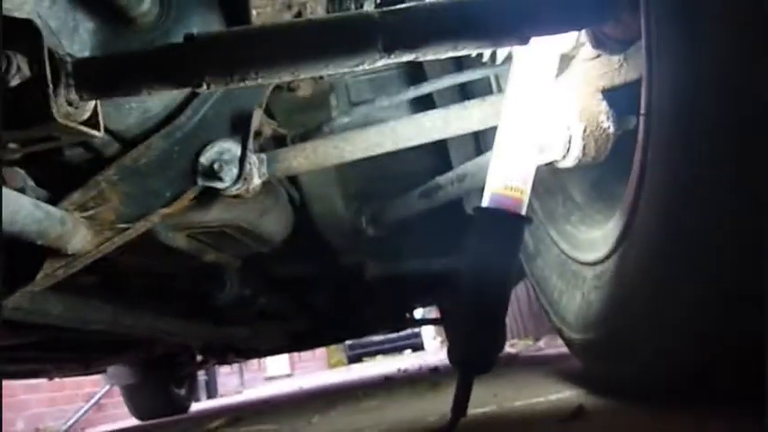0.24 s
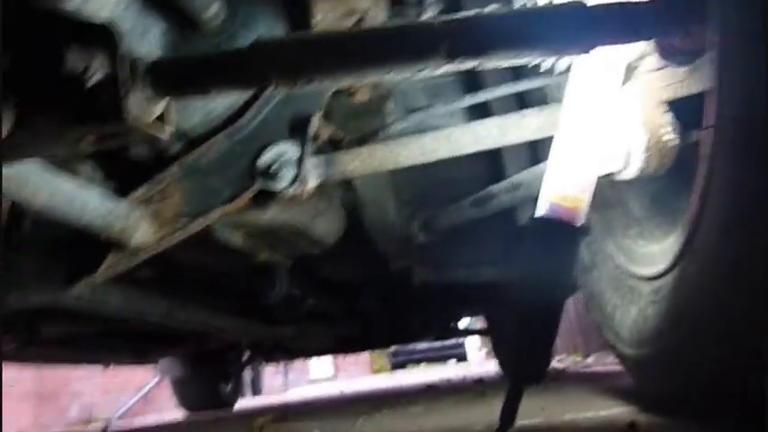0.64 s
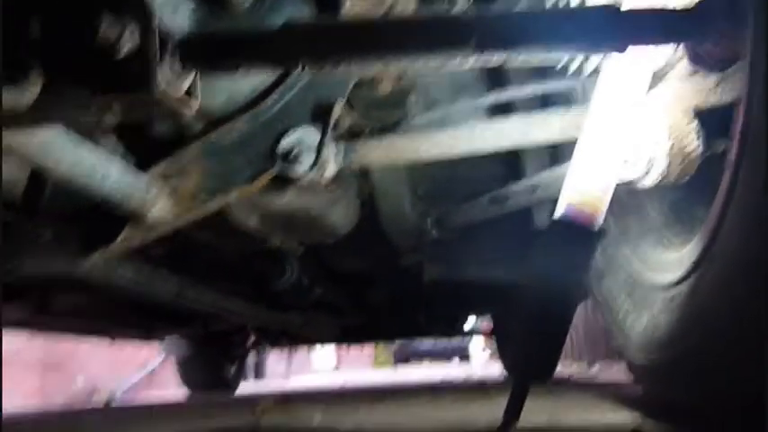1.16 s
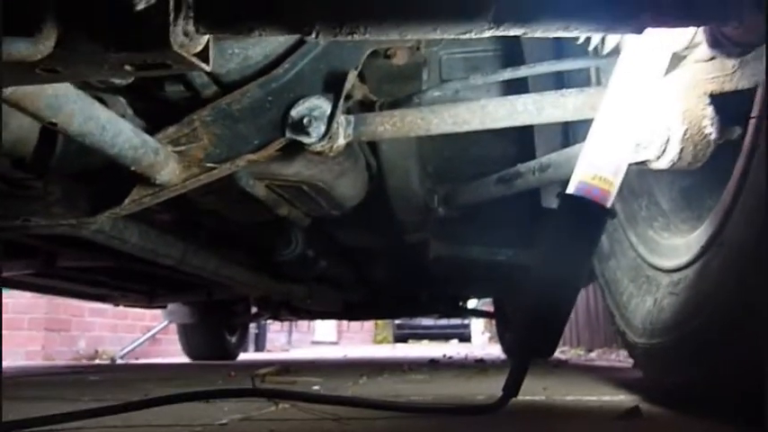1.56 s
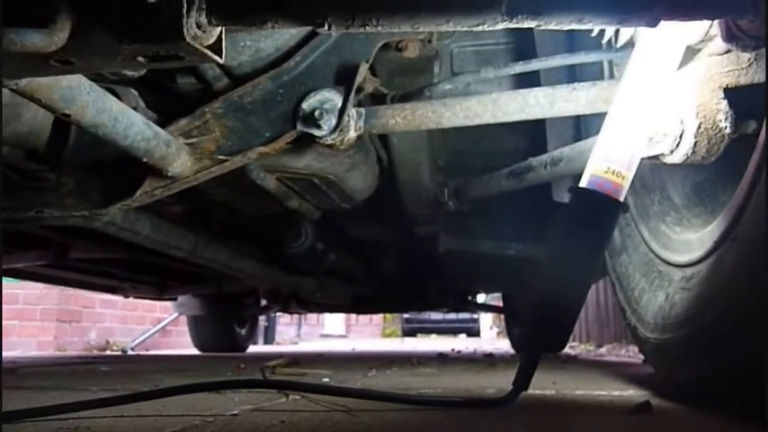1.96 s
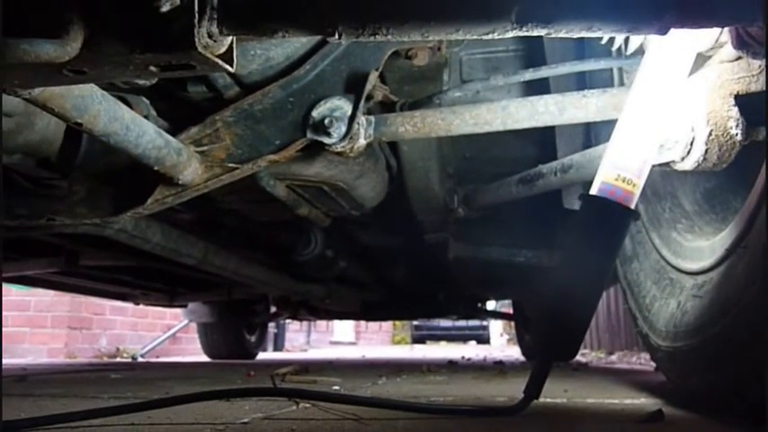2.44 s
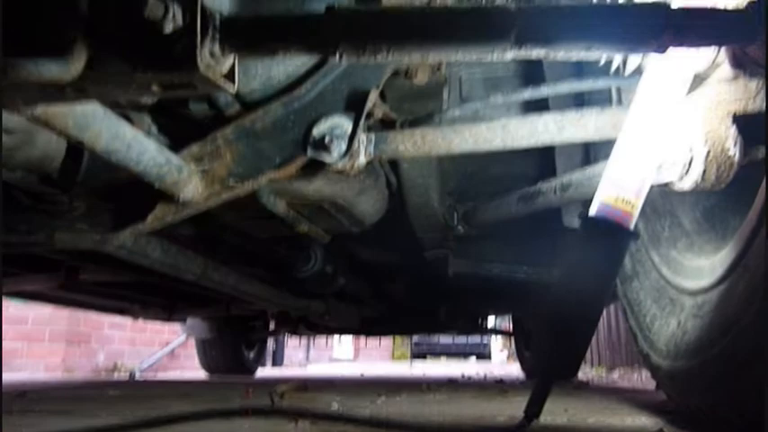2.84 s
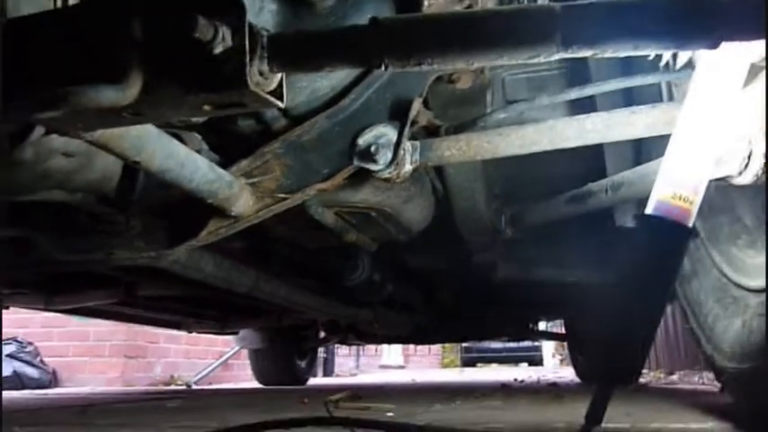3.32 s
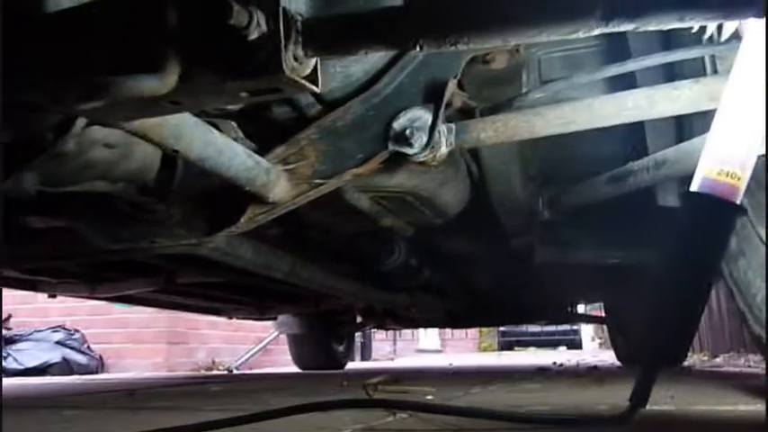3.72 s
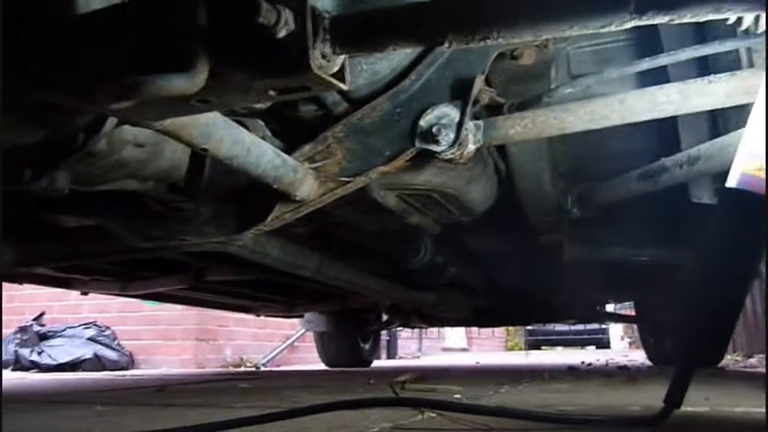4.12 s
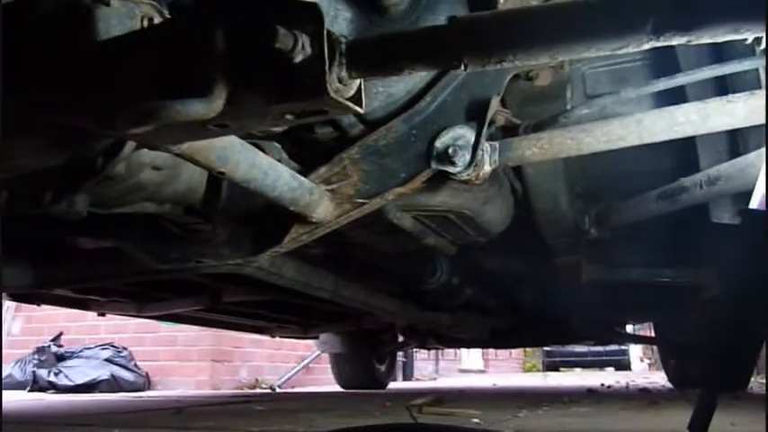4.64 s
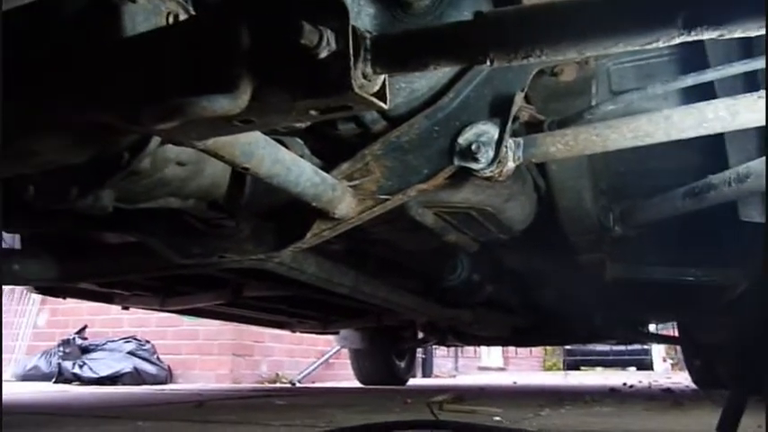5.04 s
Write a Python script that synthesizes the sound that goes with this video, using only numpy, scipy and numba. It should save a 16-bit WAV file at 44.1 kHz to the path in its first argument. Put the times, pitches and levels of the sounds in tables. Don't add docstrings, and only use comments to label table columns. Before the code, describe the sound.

Close under a car, a worn rubber suspension bush sticks and slips. Dull knocks with gritty cracks and small metallic clinks come first, then two loud dry pops. A quieter stretch of ticks and faint metal humming follows, then more knocks and judder, a late pop and small scrapes. Small camera microphone, dull top, light hiss.

```python
import sys
import numpy as np
from scipy import signal
from scipy.fft import rfft, irfft
from scipy.io import wavfile
from scipy.ndimage import uniform_filter1d
from numba import njit

SR = 44100
rng = np.random.default_rng(int(sys.argv[2]) if len(sys.argv) > 2 else 0)


def transcribe(u):
    v = np.clip(np.atleast_2d(u).T, -1, 1)
    q = np.round(v * 32767).astype(np.int16)
    wavfile.write(sys.argv[1], SR, q)


def gain_from_db(level_db):
    decades = np.asarray(level_db, float) / 20
    return 10 ** decades


N = 233107

# time in seconds, groan level in dB.
LOAD_CURVE = [(0, -52), (.3, -56), (.7, -54.5), (1.09, -56.5), (1.45, -60.5), (1.9, -63.5), (2.9, -59.5),
              (3.55, -59), (3.99, -58), (4.64, -64), (5.29, -63)]


@njit
def band(x, hz, width):
    y, b, l = np.empty(len(x)), 0., 0.
    g, k = np.tan(np.pi * hz / SR), width / hz
    for i in range(len(x)):
        v = (b + g * (x[i] - l)) / (1 + g * (g + k))
        b, l, y[i] = 2 * v - b, l + 2 * g * v, k * v
    return y


def steep(x, hz, width):
    once = band(x, 1. * hz, 1. * width)
    return band(once, 1. * hz, 1. * width)


@njit
def follow(x, attack, release):
    y, e = np.empty(len(x)), 0.
    for i in range(len(x)):
        e += (abs(x[i]) - e) * (attack if abs(x[i]) > e else release)
        y[i] = e
    return y


def unit(x):
    return x / np.sqrt(np.mean(x ** 2))


def fall_by_8_db(t, ms):
    return gain_from_db(-8 * t / (ms / 1000))


def swells(table):
    t = np.arange(N) / SR
    return sum(gain_from_db(db) * np.exp(-(2 * (t - s) / length) ** 2) for s, length, db in table)


def grains(rate_hz, spread_db):
    happens, sign, size = rng.random((3, N))
    return (happens < rate_hz / SR) * np.sign(sign - .5) * gain_from_db(-spread_db * np.log(1 - size))


def frame(x):
    # pitch in Hz, level in dB, time to fall 60 dB in seconds.
    members = [(183.45, 3, 0.0388), (267, -3.5, 0.061), (300.84, 3.5, 0.085), (466.1, 0, 0.06),
               (526.7, 3, 0.061), (610, -18.5, 0.2), (930, -6, 0.04)]
    return sum(gain_from_db(db) * band(x, 1. * hz, np.log(1000) / np.pi / t60) for hz, db, t60 in members)


def bracket(x):
    # centre in Hz, width in Hz, level in dB.
    modes = [(790, 589, 13), (1178.7, 503, 15.5), (1915, 400, 8), (2930, 420, -2.5), (3510, 540, -8),
             (4240, 880, -13.5)]
    return sum((-1) ** k * gain_from_db(db) * steep(x, hz, 1.41 * w) for k, (hz, w, db) in enumerate(modes))


def hiss():
    # frequency in Hz, density in dB per Hz.
    spectrum = [(20, -18.5), (60, -6), (200, -12), (600, -20.5), (1300, -27), (4000, -30.5), (6800, -32.5),
                (7900, -26)]
    level_db, flutter_db, flutter_s, per_load_db = -56.5, 0.8447, .07, 0.1121
    whine_hz, whine_db = 6667, -86.5
    t = np.arange(N) / SR
    hz = np.maximum(np.arange(N // 2 + 1) * SR / N, 1)
    at_hz, density_db = np.transpose(spectrum)
    shape = gain_from_db(np.interp(np.log(hz), np.log(at_hz), density_db))
    noise = unit(irfft(rfft(rng.standard_normal(N)) * shape, N))
    span = int(flutter_s * SR)
    steps = np.repeat(rng.standard_normal(N // span + 1), span)[:N]
    flutter = unit(uniform_filter1d(steps, span // 2))
    load_db = np.interp(t, *np.transpose(LOAD_CURVE))
    noise *= gain_from_db(flutter_db * flutter + per_load_db * (load_db - load_db.mean()))
    return gain_from_db(level_db) * noise + gain_from_db(whine_db) * np.sqrt(2) * np.sin(2 * np.pi * whine_hz * t)


def creep():
    # middle in seconds, length in seconds, level in dB.
    heaves = [(.06, 0.065, -52.5), (.19, 0.052, -52), (.46, 0.128, -51), (.54, 0.0183, -55.5),
              (1.14, 0.04623, -48), (1.26, 0.034, -44.5), (1.46, 0.074, -43.5), (1.88, 0.132, -58.5),
              (3.14, 0.051, -52), (3.22, 0.057, -58.5), (3.34, 0.095, -51.5), (3.54, 0.0385, -40.5),
              (3.69, 0.14, -54), (.33, 0.13, -58), (4.24, 0.185, -65.5), (3.87, 0.051, -45.5),
              (3.95, 0.05, -45.5), (4.43, 0.12, -63.5), (4.67, 0.103, -56.5)]
    # middle in seconds, length in seconds, level in dB.
    singing = [
        (1.9, 0.18, -59.5),
        (2.13, 0.155, -60.5),
        (2.28, 0.129, -55.5),
        (2.56, 0.118, -56),
        (2.71, 0.1315, -53.5),
        (2.85, 0.202, -58),
        (3.09, 0.12, -61.5),
    ]
    # middle in seconds, length in seconds, level in dB.
    singing_low = [
        (3.57, 0.214, -52.5),
        (3.7, 0.118, -46.5),
        (3.89, 0.152, -50.5),
        (4.08, 0.06, -57),
    ]
    grit_db, sway_under_load_db = -71, -11
    load = gain_from_db(np.interp(np.arange(N) / SR, *np.transpose(LOAD_CURVE)))
    soft = steep(grains(rate_hz=550, spread_db=2.5), 300, 600)
    groan = unit(band(soft, 200.0, 240.0) + frame(soft))
    grit = unit(bracket(grains(rate_hz=1500, spread_db=0.5)))
    sway = unit(steep(grains(rate_hz=190, spread_db=2.5), 105, 150))
    heave = swells(heaves) + gain_from_db(sway_under_load_db) * load
    push = steep(grains(rate_hz=360, spread_db=1.0), 642, 850)
    hum = unit(band(push, 518.2, 17.9) + 0.246 * band(push, 582.0, 23.0) + 0.089 * band(push, 880.0, 60.0))
    low_hum = unit(band(push, 307.83, 4.6))
    sung = swells(singing) * hum + swells(singing_low) * low_hum
    return load * groan + gain_from_db(grit_db) * grit + heave * sway + sung


def rasps():
    # middle in seconds, length in seconds, level in dB, colour in Hz.
    scrapes = [(.137, .012, -62, 3000), (.198, .008, -42, 1900), (.43, .006, -51, 4600),
               (.815, .05, -58, 2600), (.87, .025, -59, 1800), (1.243, .058, -48, 1360),
               (1.475, .035, -52, 2800), (1.478, .012, -43, 1900), (1.52, .023, -47, 1530),
               (1.645, .05, -60, 1800), (1.783, .014, -57, 3200), (1.84, .16, -62, 1100),
               (1.86, .03, -63, 2000), (1.884, .012, -55, 2050), (1.89, .012, -58, 3300),
               (1.905, .03, -63, 2000), (3.275, .04, -62, 2100), (3.343, .045, -59, 2000),
               (3.533, .081, -54, 1890), (3.548, .019, -57, 2130), (3.69, .08, -52.5, 2150),
               (3.855, .04, -61, 2050), (3.871, .03, -57, 1500), (3.932, .003, -53, 5800),
               (3.936, .024, -53, 2400), (4.623, .02, -54, 1880), (4.653, .024, -52, 1840),
               (4.82, .05, -61, 1900), (4.875, .07, -62, 2000)]
    bracket_db, relative_width = -4.0, 0.254
    t = np.arange(N) / SR
    grit = grains(rate_hz=5400, spread_db=3.5)
    broad = unit(bracket(grit))
    out = np.zeros(N)
    for s, length, db, hz in scrapes:
        here = slice(int((s - length) * SR), int((s + length) * SR))
        swell = np.exp(-4 * ((t[here] - s) / (length / 2)) ** 2)
        patch = unit(steep(grit[here], hz, relative_width * hz))
        out[here] += gain_from_db(db) * swell * (patch + gain_from_db(bracket_db) * broad[here])
    return out


def snaps():
    # start in seconds, peak in dB, colour in Hz, time to fall 8 dB in ms
    rust_breaks = [(0.0468, -38, 2660, 2.5), (0.177, -36.5, 2460, 2.5), (0.1934, -35, 2280, 3),
                   (0.1965, -35.5, 2050, 1.5), (0.2026, -58, 2270, 6.5), (0.2078, -59.5, 2560, 1.5),
                   (0.4309, -39.5, 2480, 2.2), (0.435, -54, 2510, 1.4), (0.4412, -54.5, 2680, 7),
                   (0.4567, -49, 2800, 3.5), (0.5188, -49, 2440, -1.5), (0.5308, -49, 2770, 1.9),
                   (0.6077, -47, 2880, 2.5), (0.6139, -46.5, 2990, 0.14), (0.6636, -53.5, 2950, 4.5),
                   (0.6667, -50.5, 3230, 8), (0.6738, -48.5, 3290, 1.66), (0.6775, -50.5, 2770, 1.45),
                   (0.7955, -45.5, 2530, 1), (0.7998, -51, 2940, 2.4), (0.8099, -32, 2710, 1.06),
                   (0.8221, -42, 2830, 1.5), (0.861, -45, 2480, 4), (0.8691, -52.5, 2780, 2.5),
                   (1.0707, -52, 2730, 0.54), (1.2321, -50.5, 2640, 5), (1.2389, -55, 2760, 3.5),
                   (1.2466, -43, 2790, 1), (1.2532, -33, 3000, 3), (1.2601, -45, 2670, 7.5),
                   (1.459, -51.5, 2550, 1.0), (1.4671, -27.5, 2280, 0.46), (1.4716, -46, 2310, 4),
                   (1.4751, -33.5, 2400, 2.5), (1.4857, -42, 2380, 2.7), (1.5058, -39.5, 2330, -0.2),
                   (1.5155, -40.5, 2120, 2.5), (1.5347, -49.5, 2840, 2.02),
                   (1.6275, -49, 3100, 5.9), (1.6339, -47, 2410, 2.2), (1.6481, -49, 3240, 0.8),
                   (1.781, -49.5, 2760, 5.9), (1.785, -41.5, 2370, 2.3), (1.7981, -56.5, 2750, 4.8),
                   (1.8133, -55.5, 2580, 3.1), (1.8772, -52, 2660, 1.1), (1.8828, -55.5, 2430, 2.7),
                   (1.889, -56, 3120, 4.9), (2.0723, -48, 2850, 3.0), (2.1221, -50.5, 2840, 0.7),
                   (2.2777, -50, 3020, 3.3), (2.2915, -48.5, 2830, 3.0), (2.5003, -51.5, 2810, 2.9),
                   (2.5655, -51, 3040, 2.8), (3.1288, -56, 2760, 3.7), (3.2641, -50, 2340, 5.9),
                   (3.2699, -54.5, 2340, 5.9), (3.2731, -47, 2310, 1.2), (3.2882, -46.5, 2230, 1.5),
                   (3.295, -52, 2800, 1.8), (3.3387, -52, 2350, 5.9), (3.5135, -48, 2230, 1.2),
                   (3.5196, -53, 2160, 5.9), (3.543, -43, 2080, 4.7), (3.5499, -51, 2670, 1.1),
                   (3.5526, -51, 2450, 3.5), (3.667, -50.5, 2370, 5.9), (3.6725, -47.5, 2620, 0.6),
                   (3.6751, -60, 2710, 1.2), (3.6841, -41, 2290, 0.9), (3.6909, -44.5, 2130, 2.8),
                   (3.6985, -55.5, 2380, 2.3), (3.7042, -56.5, 2490, 1.8), (3.7081, -51, 2630, 5.9),
                   (3.7979, -51.5, 2520, 3.2), (3.874, -51, 2410, 3.0), (3.9288, -37, 2360, 5.9),
                   (3.9315, -25, 2700, 0.7), (3.9385, -54, 2590, 1.0), (3.966, -36.5, 2110, 2.5),
                   (4.6223, -42, 2120, 2.7), (4.6339, -54.5, 2380, 2.5), (4.6507, -44, 2210, 5.9),
                   (4.6568, -37.5, 2170, 1.4)]
    spray, width, ring, ring_db, level_db = 0.55, 0.43, 0.21, 5.5, -0.5
    t = np.arange(1024) / SR
    out = np.zeros(N + len(t))
    for (s, db, hz, ms), grit in zip(rust_breaks, rng.standard_normal((128, len(t)))):
        burst = spray * min(ms / 2, 1) * grit * fall_by_8_db(t, ms)
        burst[8] += 1.5
        burst = band(burst, 1. * hz, width * hz) + gain_from_db(ring_db) * band(burst, 0.926 * hz, ring * hz)
        limits = signal.butter(4, [hz / 2, 1.499 * hz], "bandpass", fs=SR, output="sos")
        burst = signal.sosfilt(limits, burst)
        i = int(s * SR)
        out[i:i + len(t)] += gain_from_db(db + level_db) * burst / np.abs(burst).max()
    return out[:N]


def clinks():
    # start in seconds, peak in dB, pitch in Hz, time to fall 8 dB in
    # ms.
    taps = [(0.0494, -30, 870, 0.94), (0.0531, -40, 958, 4), (0.1791, -27.5, 840, 1),
            (0.1832, -36, 993, 3.5), (0.6734, -27, 900, 1.05), (0.6776, -34, 780, 0.32),
            (1.2346, -47, 1160, 4.5), (1.2466, -29, 1127, 2.66), (1.2775, -38.5, 862, 1.5),
            (1.4604, -32.5, 792, 4.5), (1.7829, -43.5, 1520, 5.5), (1.8001, -34, 774, 0.5),
            (1.8043, -32, 930, 1.5), (1.8105, -42.5, 1223, 3.5), (3.2682, -42.5, 1205, 2.32),
            (3.5334, -32, 827, 3), (3.6922, -40, 1154, 2.56), (3.874, -45, 1485, 5.0),
            (3.9193, -40, 857, 4), (3.9377, -44.5, 895, 1.5), (4.621, -39, 772, 4.5),
            (4.6316, -46.5, 1066, 2.93), (4.6474, -43.5, 1401, 6), (4.6642, -38.5, 820, 3),
            (.0468, -27.5, 878, 1.8),
        (.1973, -27, 864, 2.43),
        (1.6342, -33.5, 855, 2.17),
        (3.5299, -29, 1153, 2.66),
        (3.966, -34.5, 1380, 1.64),
        (4.6579, -40.5, 1107, 2.1),
    ]
    level_db, rise_s = 1.5, 0.00036
    t = np.arange(1024) / SR
    out = np.zeros(N + len(t))
    for s, db, hz, ms in taps:
        i = int(s * SR)
        envelope = (1 - np.exp(-t / rise_s)) * fall_by_8_db(t, ms)
        out[i:i + len(t)] += gain_from_db(db + level_db) * envelope * np.sin(2 * np.pi * hz * t)
    return out[:N]


def judder_beats():
    # start in seconds, length in seconds, knock peak in dB, knock pitch in Hz, crack over knock in dB.
    runs = [(.2015, 0.0116, -37.5, 298, -22), (.4645, 0.013, -48.5, 210, -28), (.54, .006, -39, 348, -11),
            (.68, 0.0476, -41, 280, -15), (.751, 0.0112, -42.5, 225, -25), (.835, 0.0137, -49.5, 200, -24),
            (1.0774, 0.0216, -39, 270, -31.5), (1.226, 0.0154, -32, 293, -11.5),
            (1.531, 0.015, -45.5, 240, -2.5), (3.162, 0.01557, -44, 240, -31),
            (3.3374, 0.0193, -45.5, 305, 0), (3.558, 0.0118, -47, 284, -30),
            (3.6468, .016, -45.5, 370, -23.5), (3.6604, 0.0177, -41, 326.5, -6.5),
            (3.678, 0.0155, -33, 327.6, -10.5), (3.696, 0.0221, -38, 256, -10.5),
            (3.8935, 0.0113, -48, 260, -29.5), (4.625, 0.039, -47.5, 380, -20),
            (4.8208, 0.083, -56.5, 380, 4), (4.8896, 0.0085, -45.5, 290, 2)]
    gap_s, uneven, arch_db, scatter_db, detune, fall_ms = .0078, .25, 3, -0.5, 0.14, 4.245
    rows = []
    for (s, length, db, hz, rel_db), chance in zip(runs, rng.standard_normal((len(runs), 16, 3))):
        late_s = gap_s * (np.arange(len(chance)) + uneven * (chance[:, 0] - chance[0, 0]))
        for d, (_, a, b) in zip(late_s, chance):
            if d < length:
                beat_db = db + arch_db * np.sin(np.pi * d / length) + scatter_db * a
                rows.append((s + d, beat_db, hz * np.exp(detune * b), rel_db, fall_ms))
    return rows


def all_slips():
    # start in
    # seconds, knock peak in dB, knock pitch in Hz, crack over knock in dB, time to fall 8 dB in ms.
    single_slips = [(.0462, -23.5, 197.7, -22, 4.5), (.0455, -23, 548.4, -6, 2.5),
                    (.1345, -44, 440.6, -3.5, 7), (.1762, -19, 442, -7, 3), (.1913, -18, 236.3, -13, 3),
                    (.1931, -24.5, 204, -6.5, 5.5), (.197, -28, 557.4, -20, 7.5), (.3484, -46.5, 410, -15, 6),
                    (.43, -31.5, 543, -5, 4.5), (.4442, -43.5, 503.6, -12, 17), (.4564, -27, 291, -26.5, 3),
                    (.4816, -49, 410, -12.5, 5.5), (.52, -22.5, 358, -29.5, 2.5), (.5312, -31, 300, -30, 3),
                    (.6085, -24.5, 310.4, -13, 3.5), (.6105, -29.5, 517, -30, 5.5),
                    (.6155, -33.5, 296, -32.5, 2.5), (.6616, -29, 382, -16, 10), (.674, -26.5, 366, -2, 3),
                    (.7401, -28.5, 270, -28.5, 1.5), (.7885, -35.5, 277, -22.5, 8),
                    (.7978, -31, 407, -17.5, 3), (.8098, -31, 419, -4.5, 5.5), (.8225, -33.5, 427, -20, 6),
                    (.8619, -31.5, 310, -7, 1.7),
                    (1.0234, -38, 245, -10, 3.3), (1.07, -23.5, 304, -9.5, 1.57),
                (1.112, -38.5, 211.6, -17, 15), (1.13, -41, 185, -15, 4.9), (1.2454, -33.5, 371, -9.5, 5.8),
                (1.2533, -22, 378, 1, 3.24), (1.2564, -15.5, 338.4, -7, 2.02),
                (1.4422, -38.5, 360.3, -9, 45.4), (1.4652, -32, 1093, 6, 4.6),
                (1.4742, -32.5, 603, -5.5, 5.2), (1.486, -33.5, 810, 4.5, 3.5), (1.5055, -37, 720, 8, 3.4),
                (1.5162, -31, 790, -14, 5.64), (1.5259, -36.5, 198.5, -23, 6.9),
                (1.6338, -30.5, 930, 4.5, 2.52), (1.6405, -41.5, 521, -12, 3.13),
                (1.6501, -42, 319, -18, 9), (1.6584, -33.5, 610, -2, 0.93),
                (1.7861, -32.5, 803, -2.5, 4.57), (1.7965, -40.5, 808, -5.5, 10.4),
                (1.8062, -43, 300, -12, 2.8), (1.8126, -39.5, 676, -15.5, 4.5),
                (1.8569, -49.5, 394.4, -8, 12), (1.8775, -37.5, 374.3, -26, 7.5),
                    (3.1318, -39, 356.4, -25.5, 8.7), (3.1494, -35, 248, -19, 2.27),
                  (3.212, -45, 228, -30.5, 24.5), (3.261, -39.5, 250, -18, 6.7),
                  (3.272, -36, 312.2, -19, 14.3), (3.2896, -26, 355, -20.5, 1.41),
                  (3.37, -31, 236.5, -10, 2.97), (3.4965, -40.5, 268.7, -15.5, 20),
                  (3.5131, -35.5, 198.4, -25.5, 13.2), (3.5188, -37, 218.7, -20, 12.7),
                  (3.543, -19, 204.7, -11.5, 4.02), (3.5512, -27, 318, -20.5, 2.27),
                  (3.6381, -40.5, 214, -6, 5.6), (3.8595, -34.5, 231.6, -28.5, 6.3),
                  (3.8704, -39.5, 330, -1.5, 6), (3.92, -43, 855.4, -13.5, 11.6),
                  (3.9304, -29.5, 323, -0.5, 5.2), (3.965, -36.5, 869, 4.5, 4.24),
                  (3.989, -47, 310, -12.5, 4.8), (4.069, -39, 256, -36, 6.1), (4.416, -40, 231, -9, 6.65),
                  (4.6205, -43.5, 701, -3.5, 11.8), (4.651, -38, 639.4, -2.5, 9.23),
                  (4.9025, -41, 859, -8, 5.3), (4.912, -47, 540, -27, 8.55), (1.7845, -44, 246, -27.5, 7.2),
                  (1.512, -41.5, 221.8, -26.5, 7.4), (1.633, -41.5, 419, -26, 5.2)]
    # start in seconds, knock peak in dB.
    dry_ticks = [(1.304, -52), (2.0714, -44.5), (2.1199, -43.5), (2.278, -50), (2.29, -52), (2.387, -53.5),
                 (2.499, -54.5), (2.5646, -47.5), (2.583, -57.5), (3.127, -48.5), (3.7979, -52.5),
                 (4.2461, -45.5)]
    tick_hz, tick_crack_db, tick_fall_ms = 372.6, 3, 4.13
    mid_hz, mid_db, octaves_per_db, octaves_per_sharp_db, detune = 1613, -39, 0.21, 0.19, 0.059
    rows = single_slips
    rows = rows + [(s, db, tick_hz, tick_crack_db, tick_fall_ms) for s, db in dry_ticks]
    rows = rows + judder_beats()
    coloured = []
    for row, patch in zip(rows, np.exp(detune * rng.standard_normal(256))):
        db, rel_db = row[1], row[3]
        octaves = octaves_per_db * (mid_db - db - rel_db) + octaves_per_sharp_db * (rel_db + 12)
        coloured.append(row + (patch * mid_hz * 2 ** np.clip(octaves, -1, 1),))
    return coloured


def slips():
    rise_s, rough, chatter = 0.000697, 0.4795, 0.444
    own_db, crack_db, thump_db = -7.0, 5.0, 2.0
    t = np.arange(4096) / SR
    knock, crack, colour = np.zeros((3, N + len(t)))
    grit = unit(grains(rate_hz=6000, spread_db=1.0))
    judder = unit(grains(rate_hz=700, spread_db=0.5))
    for s, db, hz, rel_db, ms, crack_hz in all_slips():
        here = int(s * SR) + np.arange(len(t))
        ms = max(ms, .7)
        fall = fall_by_8_db(t, ms)
        loose = rough * min(ms / 4, 1)
        shake = unit(steep(np.take(judder, here, mode="wrap"), hz, 1.39 * hz))
        swing = (1 - 0.717 * loose) * np.sin(2 * np.pi * hz * t + 0.682) + loose * shake
        swing += 0.26 * np.exp(-t / 0.0014) * np.sin(2 * np.pi * 1.9 * hz * t)
        knock[here] += gain_from_db(db) * (1 - np.exp(-(t / rise_s) ** 2)) * fall * swing
        spray = min(chatter * ms / 5, 1) * fall ** 1.64 * np.take(grit, here, mode="wrap")
        spray *= 1 - np.exp(-t / 0.0007)
        spray[24] += 1.8
        crack[here] += gain_from_db(db + rel_db) * steep(spray, crack_hz, 2.62 * crack_hz)
        colour[here] += gain_from_db(db + rel_db + own_db) * steep(spray, crack_hz, 410)
    knock = knock[:N]
    body = frame(knock) + gain_from_db(thump_db) * steep(knock, 140, 170)
    crack = bracket(crack[:N]) + colour[:N]
    dull = signal.sosfilt(signal.butter(3, 1900, fs=SR, output="sos"), crack)
    return knock + body + gain_from_db(crack_db) * (dull + gain_from_db(-16) * crack)


def pops():
    # start in seconds, peak in dB, pitch in Hz, time to fall 8 dB in ms, starting pitch rise.
    outwards = [
        (1.2676, -3, 462.5, 1.03, 1.454),
        (1.4503, -10.5, 362, 2, 0.893),
        (1.4534, -4.5, 461.7, 0.63, 1.08),
        (2.8938, -33, 382, 1.1, 0.56),
        (4.3926, -21, 350.4, 2.5, 2.91),
        (4.4236, -9, 330, 1.5, 3.59),
    ]
    # start in seconds, peak in dB, pitch in Hz, time to fall 8 dB in ms, starting pitch rise.
    inwards = [
        (1.2183, -25.5, 495, 1.01, 0.97),
        (3.5277, -18, 591, 0.417, 1.05),
        (3.5288, -11.5, 292, 1.4, 2.12),
    ]
    sag_s, rise_s, overshoot_s = 0.000455, 0.0003702, 0.00095
    ring_db, shove_db, shove_s = -19.5, -26.5, 0.0084
    t = np.arange(4096) / SR
    shove = gain_from_db(shove_db) * t / shove_s * np.exp(-t / shove_s)
    attack = 1 - np.exp(-(t / rise_s) ** 2)
    out = np.zeros(N + len(t))
    for (s, db, hz, ms, rise), direction in [(p, 1) for p in outwards] + [(p, -1) for p in inwards]:
        turns = hz * (t + rise * sag_s * (1 - np.exp(-t / sag_s)))
        swing = fall_by_8_db(t, ms) * np.sin(2 * np.pi * turns)
        swing *= 1 + np.exp(-(t / overshoot_s) ** 2)
        i = int(s * SR)
        out[i:i + len(t)] += gain_from_db(db) * attack * (direction * swing + (direction > 0) * shove)
    out = out[:N]
    blunt = signal.sosfilt(signal.butter(3, 2400, fs=SR, output="sos"), out)
    blunt = blunt + gain_from_db(3.0) * steep(out, 4700, 2300)
    return blunt + gain_from_db(ring_db) * frame(blunt)


def scene():
    mount = creep() + rasps() + snaps() + clinks() + slips()
    softened = signal.sosfilt(signal.butter(2, 6500, fs=SR, output="sos"), mount)
    return (softened + pops())[None, :]


def band_limit(x):
    return signal.sosfilt(signal.butter(12, 8040, fs=SR, output="sos"), x)


def record(dry):
    offset, top_hz = -.0072, 7950
    slow_duck_db, slow_duck_s = -1, 0.18
    x = dry[0] + hiss() + offset
    peak = follow(x, 0.0475, 1 / (0.015 * SR))
    x = x * np.minimum(gain_from_db(-14.5) / (peak + 1e-9), 1) ** 0.58
    slow_peak = follow(dry[0], 0.017, 1 / (slow_duck_s * SR))
    x = offset + (x - offset) * gain_from_db(slow_duck_db * np.tanh(slow_peak / gain_from_db(-22.5)))
    x = signal.sosfiltfilt(signal.cheby2(12, 40, top_hz + 200, fs=SR, output="sos"), x)
    return band_limit(x[None, :])


dry = scene()
out = record(dry)
transcribe(out)
```